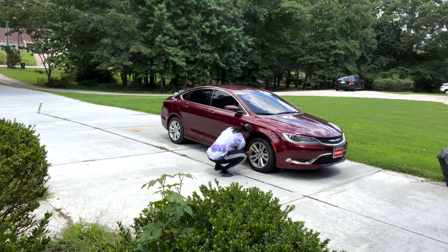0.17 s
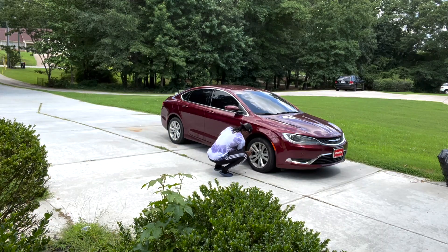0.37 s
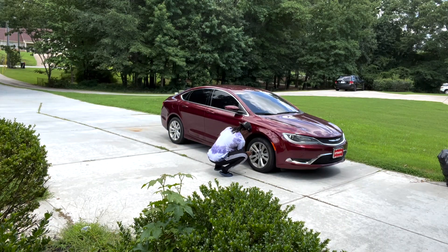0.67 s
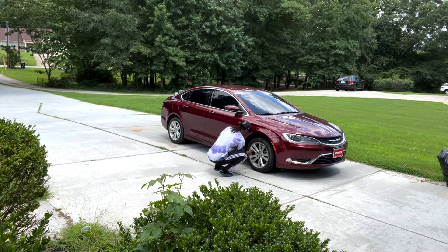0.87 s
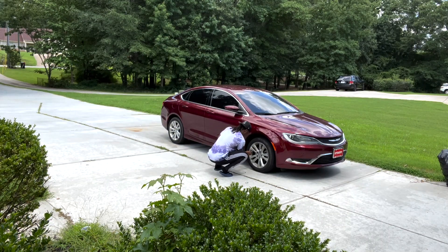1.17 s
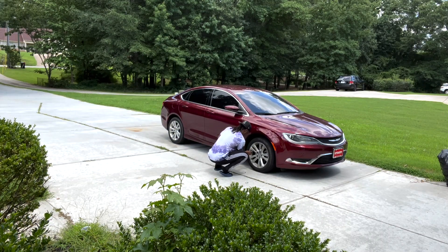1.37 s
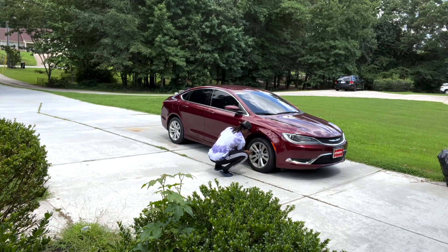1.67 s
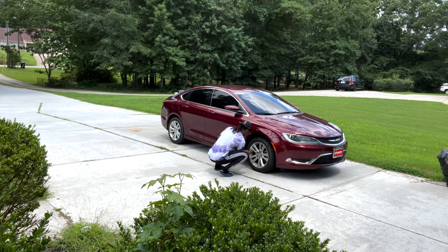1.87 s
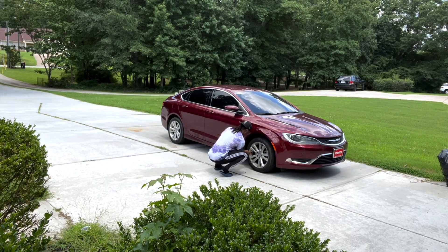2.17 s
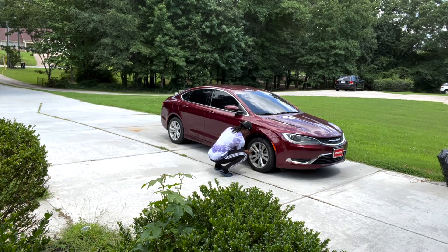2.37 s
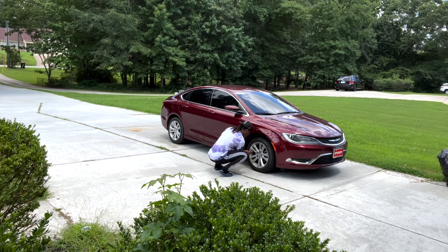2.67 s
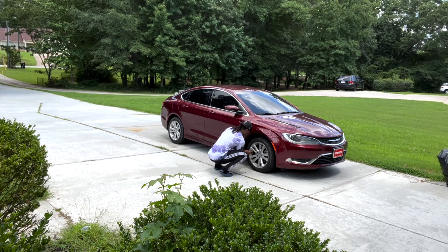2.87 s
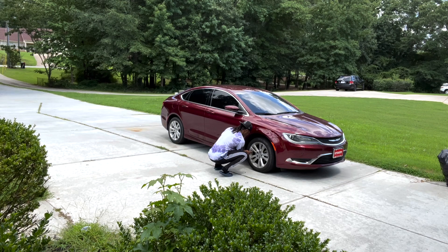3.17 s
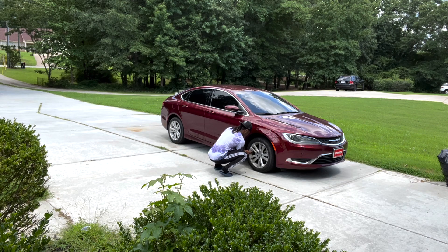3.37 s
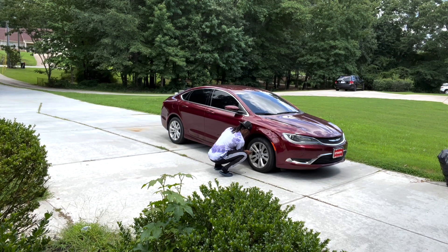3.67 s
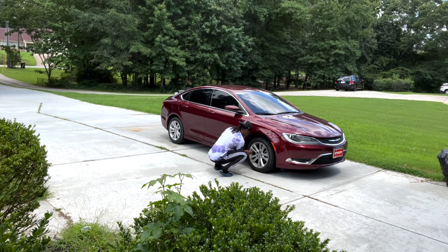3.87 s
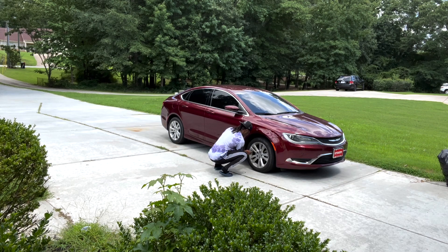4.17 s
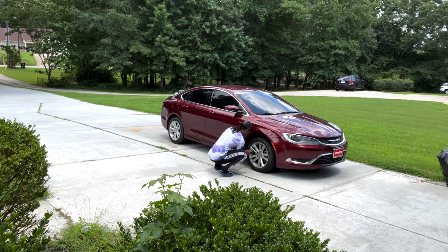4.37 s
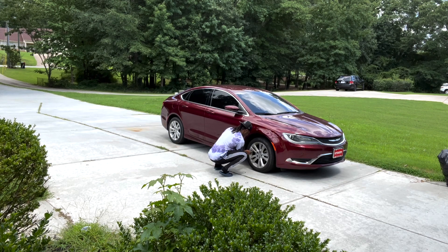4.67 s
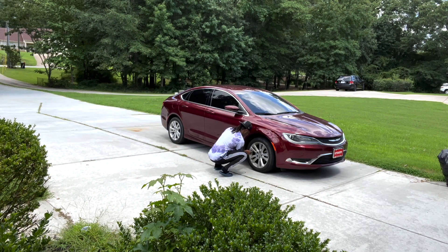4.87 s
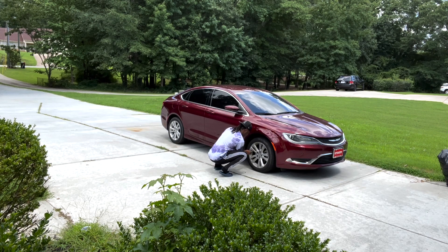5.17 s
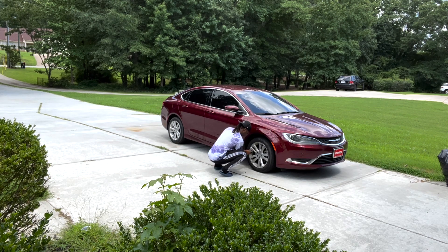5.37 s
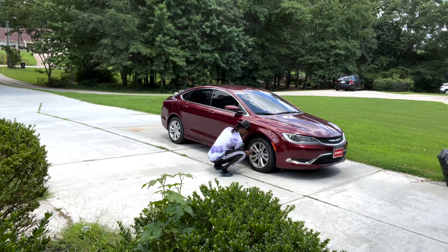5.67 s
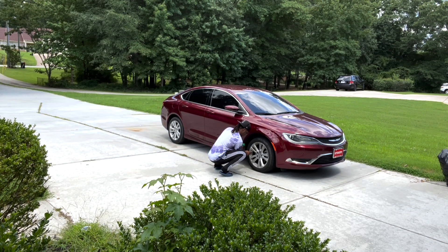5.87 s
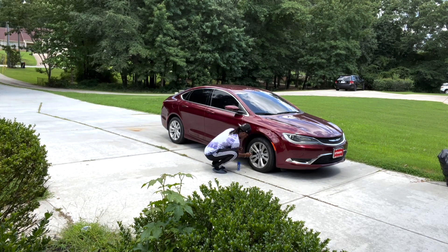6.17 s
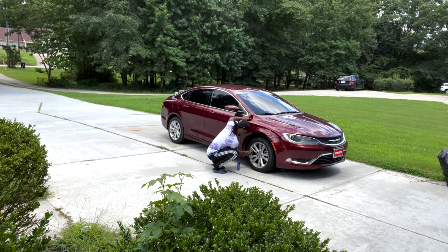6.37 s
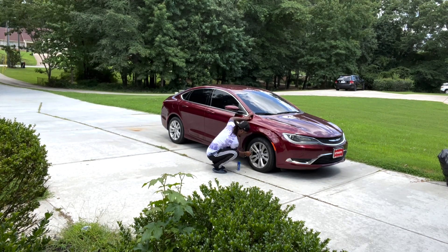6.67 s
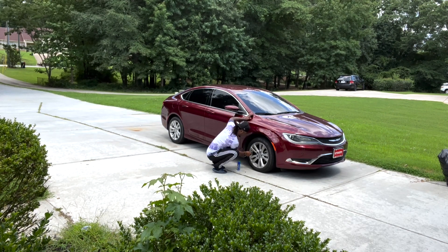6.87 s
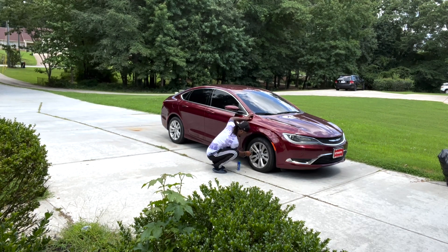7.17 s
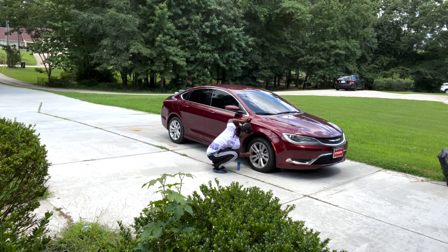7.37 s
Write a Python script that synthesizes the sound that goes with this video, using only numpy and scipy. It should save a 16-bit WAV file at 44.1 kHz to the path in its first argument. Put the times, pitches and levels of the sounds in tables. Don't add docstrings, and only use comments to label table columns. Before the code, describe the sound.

Light metallic ticks, then air hisses hard from a tyre valve outdoors, cutting out twice briefly as rising wind rumbles and flutters at the microphone.

```python
import sys
import numpy as np
from scipy import signal
from scipy.fft import rfft, irfft, next_fast_len
from scipy.io import wavfile
from scipy.ndimage import uniform_filter1d, map_coordinates

SR = 44100
rng = np.random.default_rng(int(sys.argv[2]) if len(sys.argv) > 2 else 0)


def amplitude_ratio(level_db):
    exponent = np.asarray(level_db, float) / 20
    return 10 ** exponent


def unload_wav(signal):
    wavfile.write(
        sys.argv[1],
        SR,
        np.round(np.clip(np.atleast_2d(signal).T, -1, 1) * 32767).astype(np.int16),
    )


N = 332073
T = np.arange(N) / SR

# f/Hz, level/dB
TRAFFIC = [(12, -58), (20, -29), (29, -26), (37, -8.5), (60, -2.5), (96, -0.5), (129, -4), (198, -8.5),
           (300, -24), (400, -28), (520, -47), (880, -120)]
# start t/s, end t/s, first f/Hz, last f/Hz, level/dB
ENGINES = [(0.412, 1.004, 106, 103.7, -51), (0.444, 1.1, 207.7, 205.1, -55.5),
           (1.818, 2.145, 55.1, 56.6, -50.5), (1.89, 3.236, 100.4, 96.4, -51.5),
           (2.607, 3.307, 160.1, 156.5, -51.5), (3.096, 3.597, 138.2, 100, -48),
           (3.297, 5.2, 155, 147.7, -54), (3.8, 4.705, 188.6, 183.4, -53.5), (4.247, 5.15, 92, 91.4, -44),
           (5.55, 5.846, 91.4, 69.3, -48), (5.707, 6.05, 114.6, 123, -47.5),
           (6.4, 6.803, 98.1, 108.8, -47.5), (7.147, 7.297, 135, 138.6, -41), (7.3, 7.502, 121.9, 115, -51)]
# t/s, level/dB
BREEZE = [(0, -48), (.8, -44), (1.4, -47.5), (3.2, -43.5), (3.7, -45.5), (4.8, -39), (5.3, -45), (5.9, -38),
          (6.5, -42.5), (6.9, -37), (7.53, -36.5)]
# t/s, half length/s, rumble rise/dB, buffet rise/dB
GUSTS = [(.12, .05, 1.5, 5.5), (.97, .06, -0.5, 5), (2.79, 0.043, 1.5, 3), (3.15, .1, 3, 1),
         (3.48, 0.048, 4.5, 3), (3.86, .1, 1.5, 5), (4.55, 0.044, -2, 6), (4.84, .04, -2, 3),
         (5.62, 0.11, 0.5, 6), (5.82, .12, 1, 9), (6.1, .14, 1, 13), (6.285, 0.027, 4.5, 15),
         (6.75, .03, 5.5, 14), (6.92, .03, 5, 9), (7.225, 0.034, 4.5, 8), (7.51, .03, 0.5, 6)]
# f/Hz, level/dB
BUFFET = [(30, -29), (120, -9), (250, 1), (350, -9.5), (450, -14.5), (1500, -47), (4000, -120)]
# f/Hz, left-right/dB, likeness/0-1, right leads/rad
LOW_PORTS = [(30, 0, .75, .1), (60, -1.5, .88, .2), (100, -2, .95, .25), (250, -4.5, .85, .4),
             (380, -4, .35, 1.2), (500, -2, .5, 3.1), (800, -1, .65, 3.2), (950, -2, .3, 1.5),
             (1200, -2, .5, .5)]
# f/Hz, level/dB
LEAVES = [(180, -25), (300, -5.5), (352, -5), (412, -23), (470, -8), (609, -11.5), (954, -13), (1090, -16),
          (2700, -29), (9500, -42.5), (12400, -80), (20900, -120)]
# t/s, half length/s, rise/dB
PUFFS = [
    (6.93, 0.046, 9),
    (7.09, 0.033, 3),
    (7.19, 0.037, -3),
    (7.3, .06, 1.5),
    (7.425, 0.044, 8),
]
# t/s, step peak/dB
FILTER_STEPS = [(5.234, -43.5), (5.373, -46), (5.555, -40.5), (5.596, -41), (5.7, -40.5), (5.796, -43),
                (5.874, -37.5), (6.028, -40), (6.113, -57), (6.136, -53), (6.162, -53), (6.267, -39.5),
                (6.318, -50), (6.361, -45), (6.451, -45), (6.503, -46), (6.545, -38), (6.595, -43),
                (6.675, -40), (6.713, -39), (6.766, -36), (6.907, -35), (7.084, -40), (7.136, -40),
                (7.269, -47), (7.282, -39.5), (7.319, -36.5), (7.335, -45), (7.36, -41.5), (7.42, -42)]
# t/s, peak level/dB, f/Hz
TICKS = [
    (0.1144, -40, 5300),
    (0.173, -46, 3990),
    (0.2312, -41, 6600),
    (0.2683, -50, 4770),
    (0.2987, -53, 4760),
    (0.3396, -57, 4870),
    (0.85, -60, 2060),
]
# start t/s, end t/s, f/Hz, level/dB
SCUFFS = [
    (.22, 0.38, 5500, -73),
    (.83, 0.915, 3500, -81),
]
# t/s, level under full flow/dB
OPENING = [
    (1.145, -42),
    (1.17, -35),
    (1.21, -31),
    (1.235, -19),
    (1.31, -14),
    (1.53, -1.5),
]
# t/s, level/dB, sag/(dB per s)
PRESSES = [
    (1.53, -40, -0.1),
    (5.6, -40, -1.5),
    (6.22, -41, 1),
    (7.38, -42, 8),
]
# closes t/s, reopens t/s, closing time/s, rise time/s
SLIPS = [
    (6.054, 6.2165, .055, .002),
    (7.233, 7.371, .022, .008),
]
# t/s, pose/0-2
HAND_POSE = [(0, 0.04), (3.3, 0), (3.4, 1.14), (5.5, 1), (5.6, 1.55), (6.1, 2), (6.2, 1.38), (6.7, 2),
             (7.53, 1)]
# f/Hz, width/Hz, level in pose 0/dB, pose 1/dB, pose 2/dB
STEM = [(1363, 200, -16, -27, -22.5), (1827, 270, -15, -18.5, -12.5), (2458, 370, -13.5, -11.5, -10),
        (2600, 330, -14.5, -20, -12.5), (2940, 120, -18, -28, -12), (3575, 650, -7, -15, -7),
        (4100, 560, -7.5, -14.5, -8), (4706, 420, -12, -11, -5), (5420, 1240, -10.5, -12.5, -8),
        (6030, 840, -6.5, -5, -5), (6620, 450, -8, -6.5, -3.5), (7230, 290, -8, -14, -6),
        (7750, 260, -6, -6, -2.5), (8254, 300, 2.5, -1, 0), (8760, 600, -6, -4, -1.5),
        (9640, 570, -5.5, -5, -6), (10600, 940, -6, -3.5, -3), (11500, 300, -19.5, -15, -13),
        (13100, 700, -15, -16, -12.5), (14000, 640, -12, -11, -20), (14760, 450, -17, -18, -8.5),
        (15200, 400, -14, -9.5, -15), (15800, 500, -13, -14, -10)]
# f/Hz, level/dB
JET = [(500, -18.5), (900, -21), (2000, -18.5), (3000, -16), (7500, -13), (12200, -17.5), (15800, -45)]
# f/Hz, width/Hz, depth/0-1
NOTCHES = [(1950, 120, .5), (2850, 110, .7), (3250, 150, .8), (5500, 140, .6), (7450, 180, .6),
           (12250, 130, .8), (13650, 150, .45), (14550, 120, .15)]
# delay t/s, level/dB
ECHOES = [
    (.0031, -28),
    (.0058, -18),
    (.0094, -15),
    (0.0136, -18),
    (.021, -27),
]
# f/Hz, left-right/dB, likeness/0-1, right leads/rad
PORTS = [(450, -2, .5, 3.1), (800, -1, .75, 3.3), (950, 1, .3, 1.7), (1100, 2, .6, .3), (1500, -1, .7, .8),
         (1900, -3, .8, .9), (2050, -1, .8, .1), (2450, 0, .97, 0), (2800, -1, .75, 0), (2950, -4, .15, .1),
         (3250, 0, .7, .1), (3600, -1, .82, .3), (4050, -1, .6, .8), (4400, -3, .5, .5), (4700, 2, .85, .1),
         (5400, 0, .4, 1.3), (6000, -2, .87, 2.1), (6600, -17, .25, 3.9), (6900, -5, .5, 5.6),
         (7300, -3, .15, 7), (7500, -3, .5, 8.7), (8300, -1, .87, 7.9), (9100, 0, .6, 7.9),
         (10700, 0, .85, 7.9), (12200, 0, .2, 7.9), (13000, 0, .55, 7.9), (13650, 0, .35, 7.5),
         (14000, 0, .72, 7.8), (14600, 0, .45, 7.6), (15500, 0, .75, 7.7)]

BUFFET_DB, BUFFET_GROWS, LEAVES_GROW = -58.5, .6, .3
LEAVES_DB, LEAVES_SETTLE_S, LEAVES_SETTLE_DB = -68.5, 7.2, -7
WHISTLE_FROM_S, WHISTLE_RISE_S, WHISTLE_DB = 6.62, 0.15, -47.5
TICK_T60_S, TICK_RINGS = 0.025, 0.52
THIN_BELOW_HZ, THIN_PER_DB = 3000, .22
FIZZ_DB, FIZZ_PER_POSE_DB = -5, -2.5
POP_DB, POP_S = 4.5, 0.084
SHUT_DB, INSECT_TOP_HZ = 70, 11150
TOP_HZ, EDGE_HZ = 15790, 90


def unit(x):
    return x / np.sqrt(np.mean(x ** 2) + 1e-20)


def along(points, hz):
    f, *cols = np.transpose(points)
    return np.squeeze([np.interp(np.log(hz + 1), np.log(f + 1), c) for c in cols])


def curves(rows):
    s, *cols = np.transpose(rows)
    return [np.interp(T, s, c) for c in cols]


def swells(rows):
    s, half, *rises = np.transpose(rows)
    return np.array(rises) @ np.exp(-((T - s[:, None]) / half[:, None]) ** 2)


def wobble(rate):
    return map_coordinates(rng.standard_normal(int(N * rate / SR) + 4), [T * rate])


def filtered(x, response):
    m = next_fast_len(N + 8192)
    return irfft(rfft(x, m) * response(np.fft.rfftfreq(m, 1 / SR)), m)[..., :N]


def peak(hz, centre_hz, width_hz):
    return 1j * hz * width_hz / (centre_hz ** 2 - hz ** 2 + 1j * hz * width_hz)


def noise(patchy_db, channels=2):
    z = signal.stft(rng.standard_normal((channels, N + 512)), nperseg=512)[2]
    field = rng.standard_normal(z.shape[1:])
    field = uniform_filter1d(field, size=5, axis=0)
    field = uniform_filter1d(field, size=10, axis=1)
    return signal.istft(z * amplitude_ratio(patchy_db * unit(field)), nperseg=512)[1][:, :N]


def at_ports(pair, ports):
    def mix(hz):
        pan_db, alike, lead = along(ports, hz)
        turn = np.arccos(np.clip(alike, 0, 1)) / 2
        ear = amplitude_ratio([pan_db / 2, -pan_db / 2]) * np.exp([-.5j * lead, .5j * lead])
        return np.array([ear * np.cos(turn), ear * np.sin(turn) * [[1], [-1]]])
    return filtered(pair[:, None], mix).sum(axis=0)


def engines():
    out = np.zeros(N)
    for start, end, first_hz, last_hz, db in ENGINES:
        u = np.clip((T - start) / (end - start), 0, 1)
        pitch_hz = (first_hz + (last_hz - first_hz) * u) * (1 + 0.00773 * wobble(8))
        level = amplitude_ratio(db + 3.5 + 2.9 * wobble(8)) * np.sin(np.pi * u) ** 0.34
        out += level * np.sin(2 * np.pi * np.cumsum(pitch_hz) / SR)
    return out


def rumble():
    breeze_db, = curves(BREEZE)
    rumble_rise_db, buffet_rise_db = swells(GUSTS)
    buffet_db = BUFFET_DB + BUFFET_GROWS * (breeze_db - breeze_db.mean()) + buffet_rise_db
    road = filtered(noise(patchy_db=0), lambda hz: amplitude_ratio(along(TRAFFIC, hz)))
    road = unit(amplitude_ratio(1.0 * wobble(5)) * road)
    gusts = filtered(noise(patchy_db=0.5), lambda hz: amplitude_ratio(along(BUFFET, hz)))
    gusts = unit(amplitude_ratio(2.2 * wobble(7)) * gusts)
    first_of_pair = [[1], [0]]
    return amplitude_ratio(breeze_db + rumble_rise_db - 1.5) * road + amplitude_ratio(buffet_db) * gusts + engines() * first_of_pair


def buzz(rate, centre_hz, width_hz, sharp, db, alike):
    swell = (.5 + .5 * np.cos(2 * np.pi * rate * T + .3 * wobble(2.95))) ** sharp
    song = filtered(noise(patchy_db=0.0), lambda hz: peak(hz, centre_hz, width_hz) ** 2)
    a, b = amplitude_ratio(db + 1.9 * wobble(5.8)) * unit(swell * song)
    return np.array([a, alike * a + np.sqrt(abs(1 - alike ** 2)) * b])


def yard():
    hush = unit(filtered(noise(patchy_db=2.5), lambda hz: amplitude_ratio(along(LEAVES, hz))))
    chorus = buzz(72, 10600, 520, sharp=0.25, db=-74.5, alike=.1)
    crickets = buzz(47, 7300, 900, sharp=0.25, db=-89, alike=.4) * amplitude_ratio([[-5], [4]])
    swell = amplitude_ratio(2.5 + LEAVES_GROW * swells(GUSTS)[1] + LEAVES_SETTLE_DB * (T > LEAVES_SETTLE_S))
    leaves = swell * amplitude_ratio(LEAVES_DB + 3.5) * amplitude_ratio([[-1.5], [1.5]]) * hush
    return leaves + (chorus + crickets) * swell ** 0.57


def whistle():
    def cavity(hz):
        return peak(hz, 823, 390) ** 2 + 1.7 * peak(hz, 950, 380) ** 2 + 0.34 * peak(hz, 1350, 470)
    level_db = WHISTLE_DB + swells(PUFFS)[0]
    blown = unit(amplitude_ratio(1.8 * wobble(45)) * filtered(noise(patchy_db=1), cavity))
    return amplitude_ratio(level_db - 2.5) * blown * np.clip((T - WHISTLE_FROM_S) / WHISTLE_RISE_S, 0, 1)


def patter():
    beat = np.zeros(N)
    at = np.round(np.arange(.012, N / SR, 1 / 59.94) * SR).astype(int)
    between = np.arange(len(at)) % 2
    beat[at] = amplitude_ratio(rng.normal(0, 1, len(at)) - 14 * between)
    return amplitude_ratio(-77) * unit(filtered(beat, lambda hz: peak(hz, 1700, 290) ** 2)) * amplitude_ratio([[3], [-4]])


def filter_steps():
    step_s, step_db = np.transpose(FILTER_STEPS)
    jumps = np.zeros(N)
    at = np.round((step_s + 1 / 500) * SR).astype(int)
    jumps[at] = amplitude_ratio(step_db + 8.5) * np.sign(rng.standard_normal(len(step_s)))
    return filtered(jumps, lambda hz: SR / (2 * np.pi) / (150 + 1j * hz)) * amplitude_ratio([[-6], [3]])


def ticks():
    out, t = np.zeros((2, N + SR)), np.arange(SR // 8) / SR
    for s, db, hz in TICKS:
        grit = rng.standard_normal((2, len(t)))
        ring = TICK_RINGS * np.sin(2 * np.pi * hz * t)
        crack = (grit + ring) * amplitude_ratio(-60 * t / TICK_T60_S)
        answer = 0.19 * grit * amplitude_ratio(-60 * t / 0.25)
        out[:, round(s * SR):][:, :len(t)] += amplitude_ratio(db - 4) * (crack + answer)
    return filtered(out[:, :N], lambda hz: (peak(hz, 2800, 3700) + .5 * peak(hz, 5000, 4200)) ** 2)


def scuffs():
    out = np.zeros(N)
    for start, end, centre_hz, db in SCUFFS:
        stroke = np.sin(np.pi * np.clip((T - start) / (end - start), 0, 1)) ** .7
        stroke = stroke * amplitude_ratio(db + 2.6 * wobble(59.5))
        out += stroke * unit(filtered(rng.standard_normal(N), lambda hz: peak(hz, centre_hz, 4000) ** 2))
    return out


def paths(hz):
    echoes = 1 + sum(amplitude_ratio(db) * np.exp(-2j * np.pi * hz * s) for s, db in ECHOES)
    return echoes * np.prod([1 - np.clip(depth, 0, 1) * peak(hz, c, w) for c, w, depth in NOTCHES], axis=0)


def colours(hz):
    power = amplitude_ratio(along(JET, hz)) ** 2 + np.zeros((3, 1))
    for centre_hz, width_hz, *pose_db in STEM:
        power += amplitude_ratio(pose_db)[:, None] ** 2 * abs(peak(hz, centre_hz, width_hz)) ** 4
    return (np.sqrt(power) * paths(hz))[:, None]


def flow():
    start, press_db, sag = np.transpose(PRESSES)
    now = np.maximum(np.searchsorted(start, T) - 1, 0)
    level_db = press_db[now] - sag[now] * np.maximum(T - start[now], 0) + curves(OPENING)[0]
    fizz_db = FIZZ_DB + FIZZ_PER_POSE_DB * np.maximum(curves(HAND_POSE)[0] - 1, 0)
    for closes, opens, closing, rise in SLIPS:
        shutting = np.clip((T - closes) / closing, 0, 1) ** (3 / 2)
        shut = np.minimum(shutting, (opens + rise - T) / rise)
        level_db = level_db - SHUT_DB * np.clip(shut, 0, 1)
        fizz_db = fizz_db + POP_DB * (T > opens) * np.exp(-abs(T - opens) / POP_S)
    return level_db, fizz_db


def jet():
    level_db, fizz_db = flow()
    pose, = curves(HAND_POSE)
    share = np.clip(1 - abs(pose - np.arange(3)[:, None, None]), 0, 1)
    hiss = unit((share * filtered(noise(patchy_db=0.5), colours)).sum(axis=0))
    top = filtered(hiss, lambda hz: hz > 11400)
    body = filtered(hiss, lambda hz: 1 / (1 + (hz / THIN_BELOW_HZ) ** 6))
    hiss = hiss + (amplitude_ratio(THIN_PER_DB * curves(OPENING)[0]) - 1) * body
    flutter = amplitude_ratio(0.21 * wobble(12) + 0.26 * wobble(40))
    near = (hiss + (amplitude_ratio(fizz_db + 9.5) - 1) * top) * amplitude_ratio(level_db + 3.5) * flutter * (T > OPENING[0][0])
    t = T[:SR // 2]
    tail = rng.standard_normal((2, len(t))) * amplitude_ratio(-60 * t / 1.9)
    far = signal.fftconvolve(near, tail / np.linalg.norm(tail[0]), axes=1)[:, :N]
    far = filtered(far, lambda hz: (hz < INSECT_TOP_HZ) / (1 + (hz / 7500) ** 8))
    return at_ports(near, PORTS) + amplitude_ratio(-23) * far


def scene():
    wind_and_road = at_ports(rumble() + whistle(), LOW_PORTS)
    surroundings = wind_and_road + yard() + patter() + ticks() + scuffs()
    return filtered(surroundings, lambda hz: hz < INSECT_TOP_HZ) + jet()


def roll_off(x):
    return signal.sosfilt(signal.butter(12, 16500, fs=SR, output="sos"), x)


def record(dry):
    def band(hz):
        return np.sin(np.pi / 2 * np.clip((TOP_HZ - hz) / EDGE_HZ, 0, 1)) ** 2
    return roll_off(filtered(dry + filter_steps(), band))


dry = scene()
out = record(dry)
unload_wav(out)
```